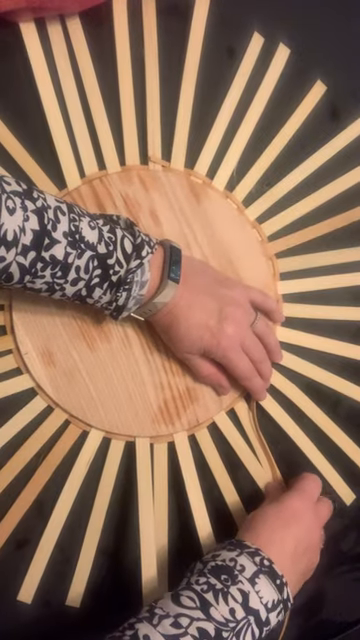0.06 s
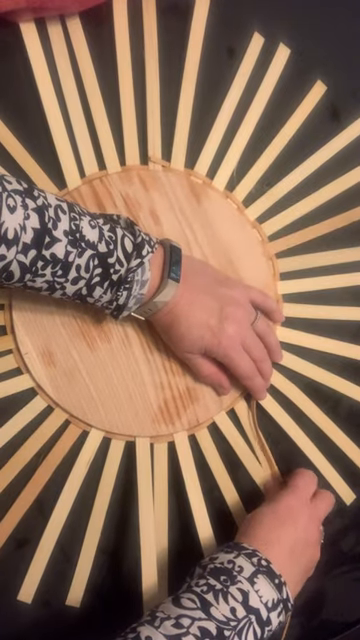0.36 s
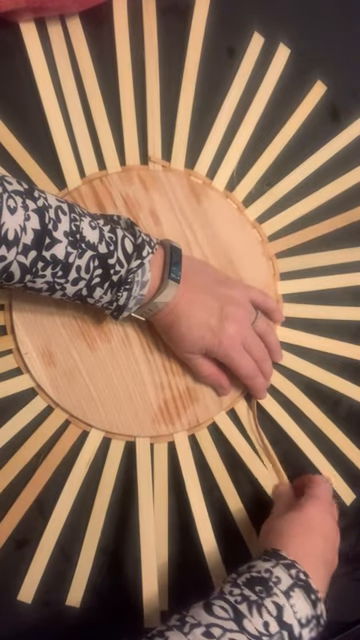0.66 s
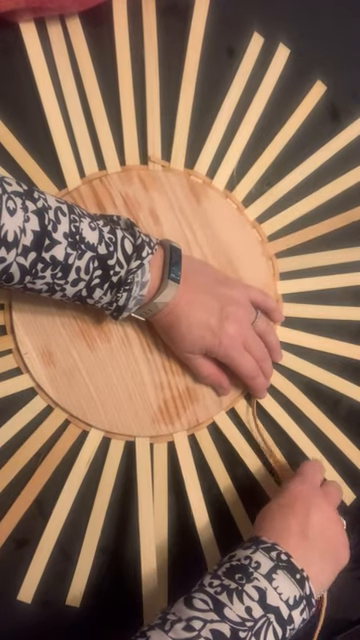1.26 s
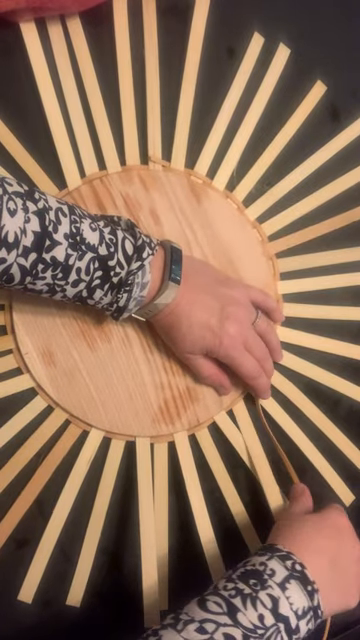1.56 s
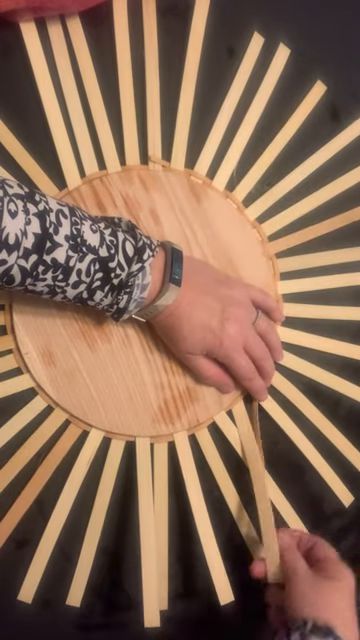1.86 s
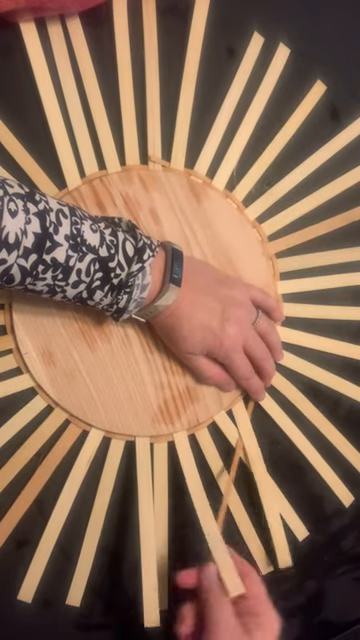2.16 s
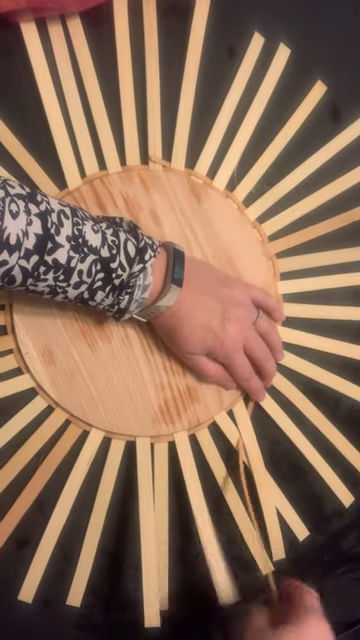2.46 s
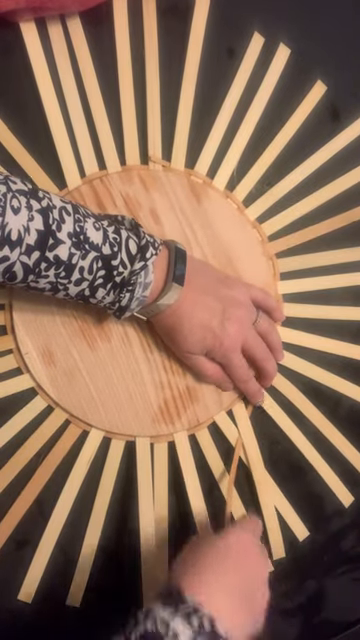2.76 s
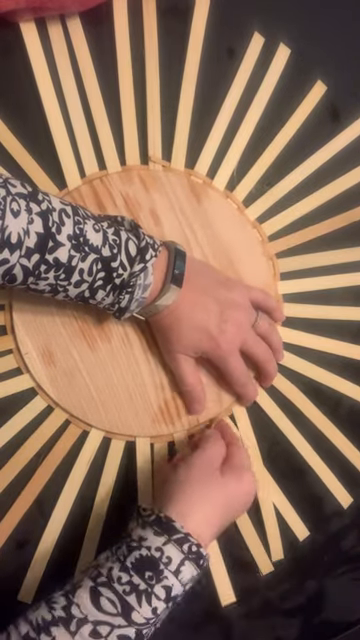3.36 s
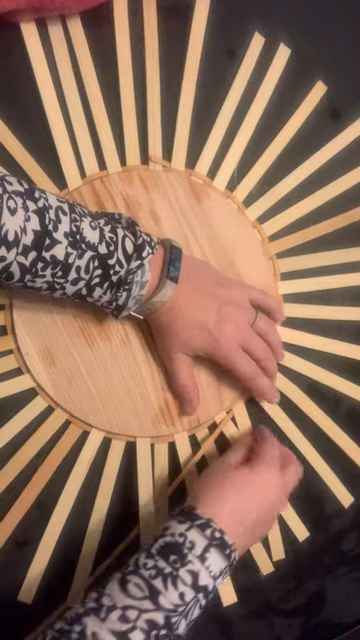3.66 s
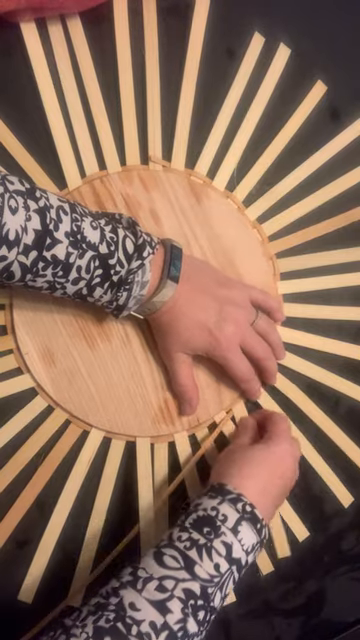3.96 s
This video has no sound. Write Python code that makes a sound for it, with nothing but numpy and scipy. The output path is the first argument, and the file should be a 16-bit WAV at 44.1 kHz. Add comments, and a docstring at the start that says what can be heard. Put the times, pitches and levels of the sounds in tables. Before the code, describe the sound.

Wooden basket spokes snap and click as a reed strand is woven between them, close up in a small, quiet room. A click opens, then loud snaps come near 0.5 and 1.1 seconds, with sliding and faint squeaks between. After a lull, scraping builds to another burst of snaps at 2.1 seconds. Softer slides, clicks, dull plops of bending wood and light table bumps continue until about 4 seconds.

```python
"""Basket weaving on a table in a small, quiet room, heard close up by two microphones 20 cm apart.
A spoke slips off the reed strand and snaps, others bend with dull plops, and the wooden base bumps the
table. Loud snaps come near 0.5 s and 1.1 s; between them the strand slides and squeaks over the flat
spokes in tiny stick-slip catches. After a lull, scraping builds to another burst of snaps near 2.1 s.
The rest is softer: slides, squeaks, small snaps and bumps, with a few more plops near the end."""
import sys
import numpy as np
from scipy import signal
from scipy.fft import rfft, irfft
from scipy.io import wavfile

SR = 44100
rng = np.random.default_rng(int(sys.argv[2]) if len(sys.argv) > 2 else 0)


def pcm_store(signal):
    """Save signal as 16-bit PCM."""
    levels = np.round(np.clip(np.atleast_2d(signal), -1, 1) * 32767)
    wavfile.write(sys.argv[1], SR, levels.astype(np.int16).T)


N = 176400

# room tone and the colour of the reverberation: f/Hz, level/dB
ROOM_TONE_SPECTRUM = [(25, -6.5), (50, 8.5), (80, 2.5), (130, -6), (260, -7), (600, -23.5), (1200, -23.5),
                      (2000, -22), (4200, -32), (8000, -25), (12000, -31.5), (16000, -36)]
REVERB_SPECTRUM = [(80, -4.5), (500, -8.5), (2000, -9.5), (4000, -24.5), (8000, -16), (16000, -18.5)]
# decay of the room: f/Hz, t60/s
REVERB_T60 = [(100, .45), (500, .47), (1500, .44), (4000, .33), (10000, .23), (16000, .16)]
# left microphone over right: f/Hz, level/dB
MIC_BALANCE = [(100, 1), (170, 0.5), (270, 2.5), (500, 7), (1000, -0.5), (2500, 1), (12000, -0.5)]
# modes of the wooden base and of a spoke: f/Hz, level/dB, t60/s
BASE_MODES = [(52.3, 0, .25), (78.53, -0.5, 0.57), (104, 0.5, .17), (143, -2.5, .2), (184.4, -5.5, 0.091),
              (201.4, -2.5, 0.3), (267.6, -2.5, 0.25)]
SPOKE_MODES = [(263.7, -9, 0.16), (446.5, -6.5, 0.05), (495, -5, 0.065), (669, -6, 0.019),
               (744, -4.5, 0.064), (954, -4.5, 0.04), (1090, -10, 0.022), (1220, -4, 0.071),
               (1342, -11.5, 0.059), (1513, -4.5, 0.05), (1822, 2, 0.015), (2758, -10.5, 0.065),
               (3154, -10, 0.057), (3717, -10, 0.04)]
# bending modes of the free strand: f/Hz, width/Hz, level/dB
STRAND_MODES = [(323, 37, -1), (999, 55, -7), (1490, 110, -8.5), (2098, 56, -12), (3340, 200, -18.5),
                (6600, 150, -29.5)]
# spectra of rubbed wood, rasping fibres, their hiss and a spoke's crack: f/Hz, level/dB
WOOD_SPECTRUM = [(60, -9.5), (150, 2.5), (330, -6.5), (520, 6.5), (850, -4.5), (1250, -4.5), (1700, -15),
                 (2200, -15), (4000, -36)]
RASP_SPECTRUM = [(500, -11), (1400, -3), (1900, -2.5), (2300, -1), (2750, -4), (3300, 3), (4300, 4),
                 (5800, -3.5), (8000, -17), (14000, -48)]
HISS_SPECTRUM = [(1500, -9), (3500, 0), (5200, 10.5), (6600, 5), (7800, -1), (10000, -5.5), (13000, -20),
                 (16000, -18.5)]
CRACK_SPECTRUM = [(300, -12.5), (1200, -3.5), (2200, -18.5), (3300, 4.5), (4200, 6), (5900, 5),
                  (7800, -4.5), (10000, -1.5), (13000, -13.5), (16000, -18)]
# the base bumping the table: t/s, level/dB
BUMPS = [(0.013, -48), (0.076, -47.5), (0.161, -54), (0.246, -51.5), (0.304, -50), (0.444, -44.5),
         (0.497, -48), (0.582, -48.5), (0.664, -57.5), (1.063, -49), (1.126, -50.5), (1.997, -58),
         (2.038, -52.5), (2.093, -43), (2.162, -46.5), (2.24, -51.5), (2.498, -61), (2.631, -62),
         (2.789, -57.5), (2.96, -60), (3.021, -46), (3.346, -48.5), (3.417, -56), (3.59, -58),
         (3.701, -62.5), (3.851, -47)]
# the strand rubbing tightly on a spoke: start/s, end/s, first f/Hz, last f/Hz, level/dB
SQUEAKS = [(0.639, 0.684, 1530, 1540, -55), (.642, 0.686, 940, 1014, -52.5),
           (0.686, 0.804, 1060, 1090, -66.5), (0.812, 0.891, 1060, 1000, -64),
           (2.343, 2.35, 3600, 3500, -56), (2.349, 2.485, 2800, 2100, -63.5),
           (0.028, 0.286, 6750, 6600, -75.5), (2.70, 2.746, 1200, 1360, -66.5),
           (2.843, 2.925, 3550, 3770, -55.5), (2.865, 2.924, 2970, 2760, -61),
           (3.238, 3.375, 1620, 1550, -64), (3.31, 3.354, 1200, 1400, -53.5),
           (3.532, 3.601, 3240, 3250, -61), (3.89, 4.03, 3850, 3040, -64), (3.964, 4.04, 1905, 2070, -58.5)]
# short scrapes of the strand: start/s, swell/s, fade to 1/e^2 in amplitude/s, wood/dB, rasp/dB, hiss/dB
SCRAPES = [(0.25, 0.035, 0.012, -42, -87, -46.5), (0.455, 0.022, 0.042, -38.5, -48.5, -56),
           (0.484, 0.017, 0.068, -45, -46, -39), (0.643, 0.014, 0.036, -46, -54, -51),
           (1.011, 0.041, 0.017, -79, -46.5, -38), (1.053, 0.022, 0.1, -48.5, -38, -43.5),
           (1.242, 0.019, 0.035, -52.5, -50.5, -51), (1.286, 0.0086, 0.02, -59.5, -76, -52.5),
           (1.529, 0.018, 0.022, -68.5, -67.5, -58), (1.781, 0.006, 0.069, -58.5, -53.5, -64.5),
           (1.887, 0.038, 0.048, -63, -56.5, -63.5), (1.975, .02, 0.081, -51.5, -42.5, -46),
           (1.93, 0.04, 0.033, -55.5, -61, -55.5), (2.03, 0.081, 0.086, -44.5, -39, -73),
           (2.097, 0.079, 0.049, -46, -51.5, -46.5), (2.448, 0.013, 0.024, -61, -43, -49),
           (2.847, 0.017, 0.063, -63, -54, -50), (2.871, 0.024, 0.085, -61.5, -54, -57),
           (2.996, 0.046, 0.036, -43.5, -49, -45.5), (3.235, 0.018, 0.085, -58.5, -62.5, -77),
           (3.304, 0.021, 0.058, -47.5, -49, -51), (3.385, 0.017, 0.0084, -53.5, -80, -59.5),
           (3.432, 0.031, 0.053, -60, -59.5, -59.5), (3.52, 0.034, 0.023, -57.5, -49.5, -52),
           (3.608, 0.016, 0.043, -54.5, -58, -72), (3.822, 0.0043, 0.11, -67, -67, -75),
           (3.941, 0.065, 0.055, -54.5, -52.5, -77)]
# long slides of the strand: start/s, end/s, wood/dB, rasp/dB, hiss/dB
SLIDES = [(-.03, 0.074, -47.5, -55, -63), (0.077, 0.325, -65, -65, -96), (0.56, 1.04, -63.5, -70, -90),
          (2.357, 2.551, -64, -61.5, -59.5), (2.556, 2.855, -63.5, -67.5, -73),
          (3.063, 3.323, -64.5, -75, -77), (3.33, 3.654, -64, -73, -91), (3.893, 4.032, -66.5, -73, -74)]
# spokes bending and springing back: t/s, level/dB, first f/Hz, last f/Hz, fade/s
FLEXES = [(.0, -44, 285, 260, 0.034), (0.156, -34, 898, 507, 0.013), (0.28, -39.5, 870, 521, 0.012),
          (.469, -40, 960, 460, 0.007), (2.622, -55.5, 596, 247, 0.034), (2.97, -59, 510, 286.4, 0.11),
          (3.466, -45, 576, 587, 0.0099), (3.769, -57.5, 609, 586, 0.0078), (3.826, -44.5, 493, 280, 0.018),
          (3.854, -46, 490, 251, 0.024)]
# spokes snapping free: t/s, crack/dB, ring/dB, share of ring time (1 = free, less under a finger)
SNAPS = [(0.0292, -37.5, -23.5, 0.48), (0.164, -60, -40, 0.47), (0.253, -68, -47.5, 0.49),
         (.340, -58, -71, .5), (0.4457, -47, -44, 1), (.497, -26.5, -42, 0.64), (0.498, -31, -45, 1),
         (.5003, -26.5, -34, 0.78), (.654, -63, -43, 0.84), (.668, -58, -55, 0.46), (0.922, -66, -63, 1),
         (1.0735, -28, -28.5, 0.8), (1.0807, -33.5, -35, 1), (1.1272, -33.5, -34, 0.74),
         (1.136, -49, -37, 0.59), (1.215, -49, -40.5, .5), (1.264, -42.5, -59.5, 0.59),
         (1.789, -59.5, -54.5, 0.8), (1.994, -43.5, -50.5, 1), (2.0149, -31, -38, 1),
         (2.043, -48, -45.5, 1), (2.063, -48, -49, 0.62), (2.0927, -22, -24.5, 0.7),
         (2.0967, -34, -42, 0.52), (2.1215, -37, -44, 0.68), (2.156, -40, -49, 0.83),
         (2.346, -55, -75, 0.6), (2.464, -57, -56.5, 0.94), (2.622, -56.5, -58, 1), (2.715, -64.5, -57, .7),
         (2.742, -51, -50, 0.47), (2.754, -71, -52, 0.77), (2.854, -50.5, -56, 0.55),
         (2.967, -51, -54.5, 1), (3.007, -44.5, -49, 1), (3.037, -48.5, -40.5, 0.6),
         (3.331, -48, -35.5, 0.56), (3.387, -53, -80, 1), (3.576, -65, -55, 1), (3.872, -59, -74, 0.9)]

MIC_SPACING_M, LEFT_LAG_S = .2, 0.00011
LOW_CUT_HZ, HIGH_CUT_HZ = 63, 16000


def undb(db):
    """Decibels to amplitude."""
    return 10 ** (np.asarray(db) / 20)


def unit(x):
    """Scale to an RMS of 1."""
    return x / np.sqrt(np.mean(x ** 2) + 1e-20)


def curve_at(points, hz):
    """A table's value at hz, joined on a log frequency axis."""
    freqs, values = np.array(points, float).T
    return np.interp(np.log(np.maximum(hz, 1)), np.log(freqs), values)


def colour(x, spectrum, taps=1024):
    """Minimum-phase filter with the given spectrum and unit power gain."""
    gain = unit(undb(curve_at(spectrum, np.fft.rfftfreq(2 * taps, 1 / SR))))
    cepstrum = irfft(np.log(gain))
    cepstrum[1:taps] *= 2
    cepstrum[taps + 1:] = 0
    impulse = irfft(np.exp(rfft(cepstrum)))[:taps]
    return signal.fftconvolve(x, impulse)[:len(x)]


def add(out, at, x):
    """Mix a sound in, starting at a time in seconds."""
    i = max(int(at * SR), 0)
    out[i:i + len(x)] += x[:max(N - i, 0)]


def wander(per_s):
    """A slow random curve with an RMS of 1."""
    return unit(np.interp(np.arange(N) / SR * per_s, np.arange(N), rng.standard_normal(N)))


def resonance(x, hz, width_hz):
    """A narrow resonance whose centre follows hz."""
    turn = np.exp(2j * np.pi * np.cumsum(hz) / SR)
    pole = np.exp(-np.pi * width_hz / SR)
    return np.real(turn * signal.lfilter([np.sqrt(1 - pole ** 2)], [1, -pole], x / turn))


def ring(modes, t, pitch_scatter=0.016, scatter_db=3.5):
    """Decaying modes of wood, struck at a slightly different place each time."""
    hz, db, t60 = np.array(modes, float).T[:, :, None]
    detune, strength, phase = rng.standard_normal((3, len(modes), 1))
    gain = undb(db + scatter_db * strength)
    waves = np.sin(2 * np.pi * (hz * (1 + pitch_scatter * detune) * t + phase))
    decay = np.exp(-np.log(1000) * t / t60)
    return 2 * np.sum(gain * waves * decay, axis=0) / np.sqrt(np.sum(gain ** 2))


def diffuse_field(count):
    """Spectra of noise from all sides at the two microphones: alike in the bass, unrelated above."""
    alike = np.sinc(2 * np.fft.rfftfreq(count, 1 / SR) * MIC_SPACING_M / 343)
    mid, side = rfft(rng.standard_normal((2, count)))
    return (mid * np.sqrt(1 + alike) + np.array([[1], [-1]]) * side * np.sqrt(1 - alike)) / np.sqrt(2)


def room_tone(level_db=-70.5):
    """The quiet air of the room, mostly low rumble, all around the microphones."""
    gain = undb(curve_at(ROOM_TONE_SPECTRUM, np.fft.rfftfreq(N, 1 / SR)))
    return undb(level_db) * unit(irfft(diffuse_field(N) * gain, N))


def reverb(x, rise_s=0.00046):
    """The near walls return a dense tail, built in octave bands; the treble dies first."""
    t, hz = np.arange(SR // 2) / SR, np.fft.rfftfreq(SR // 2, 1 / SR)
    centres = 62.5 * 2 ** np.arange(9)
    onset = 1 - np.exp(-(t / rise_s) ** 2)
    noise, tail = diffuse_field(len(t)), 0
    for centre, weights in zip(centres, np.eye(len(centres))):
        decay = onset * np.exp(-np.log(1000) * t / curve_at(REVERB_T60, centre))
        band = irfft(noise * curve_at(list(zip(centres, weights)), hz), len(t))
        tail += band * decay / np.sqrt(np.sum(decay ** 2)) * undb(curve_at(REVERB_SPECTRUM, centre))
    return signal.fftconvolve(x[None], tail, axes=1)[:, :N]


def base_bumps(rise_s=0.0042):
    """The round wooden base is nudged against the table and rings low."""
    t, out = np.arange(SR // 3) / SR, np.zeros(N)
    for at, db in BUMPS:
        add(out, at, undb(db) * ring(BASE_MODES, t) * (1 - np.exp(-t / rise_s)))
    return out


def strand_squeaks(width_share=0.054, edge_s=0.021):
    """Tight rubbing drives one narrow resonance, which slides as the point of contact moves."""
    out = np.zeros(N)
    for start, end, first_hz, last_hz, db in SQUEAKS:
        t = np.arange(int(max(end - start, edge_s) * SR)) / SR
        rubbing = rng.standard_normal(SR)[:len(t)]
        tone = resonance(rubbing, np.linspace(first_hz, last_hz, len(t)), width_share * first_hz)
        envelope = np.minimum(np.minimum(t, t[::-1]) / edge_s, 1)
        add(out, start, undb(db) * unit(tone * envelope))
    return out


def strand_ring(drive, pitch_wander=0.1):
    """The free length of the strand rings in its bending modes, which glide as the hand moves."""
    stretch = np.exp(pitch_wander * wander(per_s=10))
    return sum(undb(db) * resonance(drive, hz * stretch, width) for hz, width, db in STRAND_MODES)


def stick_slip(catches_per_s=1800, spread_db=2.5, smooth_gain=.65, grip_db=3):
    """Fibres catch and let go in tiny clicks over smooth rubbing, while the grip wavers."""
    sizes = undb(spread_db * np.minimum(rng.exponential(size=N), 4))
    signs = np.sign(rng.standard_normal(N))
    catches = unit(sizes * signs * (rng.random(N) < catches_per_s / SR))
    rubbing = smooth_gain * rng.standard_normal(N)
    grip = undb(grip_db * wander(per_s=120))
    return unit((catches + rubbing) * grip)


def strand_friction(slide_edge_s=0.0058, slide_wood_gain=0.31, spoke_gain=0.39):
    """Short scrapes ring the spokes, long slides ring the strand, and both rasp and hiss."""
    t = np.arange(N) / SR
    scrape_power, slide_power = np.zeros((2, 3, N))  # rows: wood, rasp, hiss
    for start, swell, fade, *db in SCRAPES:
        rise = np.clip((t - start) / swell, 0, 1) ** 2
        fall = np.exp(-2 * np.maximum(t - start - swell, 0) / fade)
        scrape_power += (undb(db)[:, None] * rise * fall) ** 2
    for start, end, *db in SLIDES:
        gate = np.clip(np.minimum(t - start, end - t) / slide_edge_s + .5, 0, 1)
        slide_power += undb(db)[:, None] ** 2 * gate
    slip = stick_slip()
    spoke_impulse = ring(SPOKE_MODES, t[:SR // 6])
    spoke_impulse /= np.sqrt(np.sum(spoke_impulse ** 2))
    spokes = spoke_gain * signal.fftconvolve(slip * np.sqrt(scrape_power[0]), spoke_impulse)[:N]
    strand = strand_ring(slip * np.sqrt(slide_power[0]))
    wood = colour(slip * np.sqrt(scrape_power[0] + slide_wood_gain ** 2 * slide_power[0]), WOOD_SPECTRUM)
    rasp, hiss = slip * np.sqrt(scrape_power + slide_power)[1:]
    return wood + spokes + strand + colour(rasp, RASP_SPECTRUM) + colour(hiss, HISS_SPECTRUM)


def spoke_flexes(rise_s=0.0046, glide_s=0.0073, overtone_ratio=1.7, overtone_db=-9.5, roughness=0.63):
    """Bending waves run along a spoke, high notes first, so most plops fall in pitch."""
    t, out = np.arange(SR // 4) / SR, np.zeros(N)
    for at, db, first_hz, last_hz, fade in FLEXES:
        hz = last_hz + (first_hz - last_hz) * np.exp(-(t / glide_s) ** 2)
        phase = 2 * np.pi * np.cumsum(hz) / SR
        tone = np.sin(phase) + undb(overtone_db) * np.sin(overtone_ratio * phase)
        noise = roughness * colour(rng.standard_normal(len(t)), WOOD_SPECTRUM)
        envelope = (1 - np.exp(-(t / rise_s) ** 2)) * np.exp(-t / fade)
        add(out, at, undb(db) * (tone + noise) * envelope / envelope.max())
    return out


def spoke_snaps(tick_db=22.5, chatter_db=-2, chatter_s=0.0049, rise_s=0.00094):
    """A spoke slips off the strand: a sharp tick, brief chatter on the next spoke, and ringing wood."""
    t = np.arange(SR // 6) / SR
    cracks, wood = np.zeros((2, N))
    tick = undb(tick_db) * (t == 0)
    for at, crack_db, ring_db, ring_share in SNAPS:
        chatter = undb(chatter_db) * np.exp(-t / chatter_s) * rng.standard_normal(len(t))
        add(cracks, at, undb(crack_db) * (tick + chatter))
        damped_modes = np.array(SPOKE_MODES) * [1, 1, ring_share]
        add(wood, at, undb(ring_db) * ring(damped_modes, t) * (1 - np.exp(-t / rise_s)))
    return colour(cracks, CRACK_SPECTRUM) + wood


def scene():
    """The basket sits a little nearer the right microphone; the left hears more of the low mids."""
    basket = spoke_snaps() + spoke_flexes() + base_bumps() + strand_friction() + strand_squeaks()
    hz = np.fft.rfftfreq(2 * N, 1 / SR)
    lag = np.exp(-2j * np.pi * hz * np.array([[LEFT_LAG_S], [0]]))
    direct = rfft(basket, 2 * N) * lag
    reflected = rfft(reverb(basket), 2 * N)
    balance = undb(np.array([[.5], [-.5]]) * curve_at(MIC_BALANCE, hz))
    return irfft((direct + reflected) * balance)[:, :N] + room_tone()


def record(dry):
    """The recorder cuts the lowest rumble and the very top."""
    low_cut = signal.butter(2, LOW_CUT_HZ, "high", fs=SR, output="sos")
    high_cut = signal.ellip(8, .2, 70, HIGH_CUT_HZ, fs=SR, output="sos")
    return signal.sosfilt(high_cut, signal.sosfilt(low_cut, dry))


dry = scene()
out = record(dry)
pcm_store(out)
```